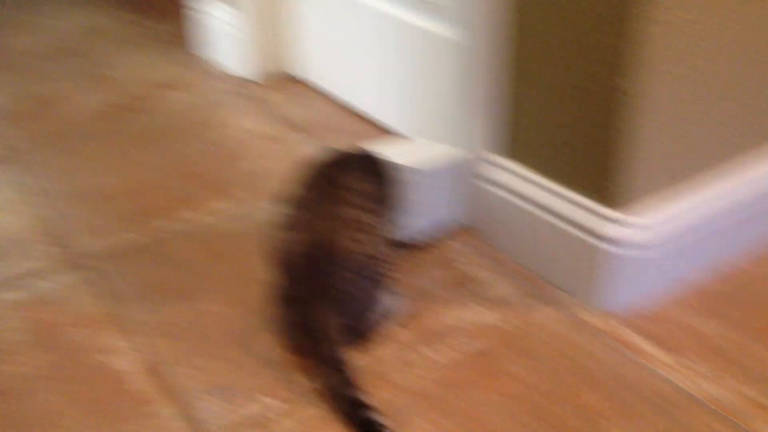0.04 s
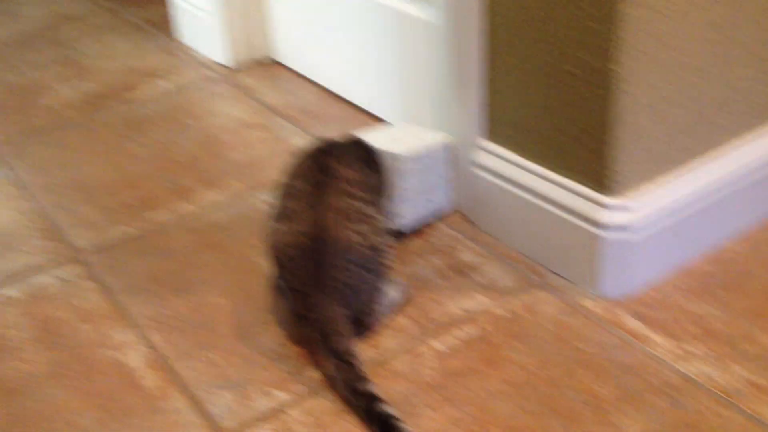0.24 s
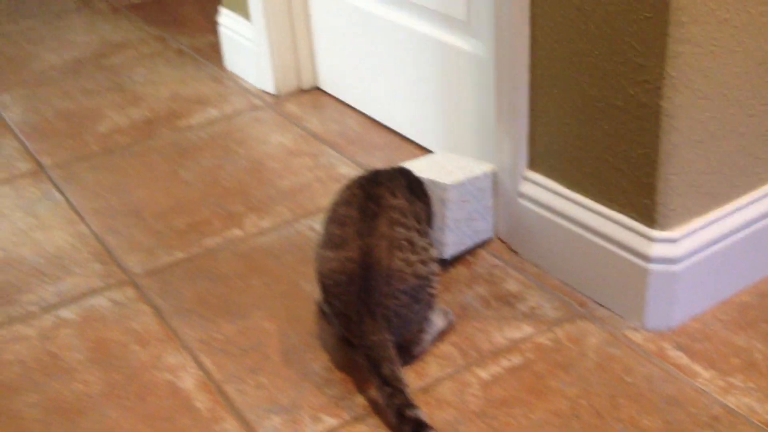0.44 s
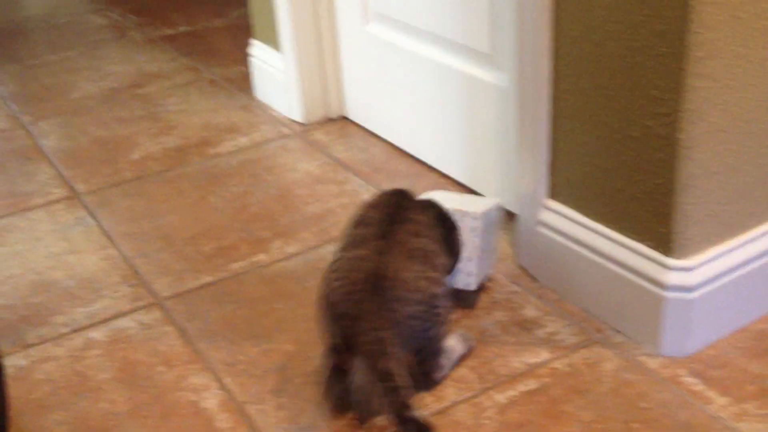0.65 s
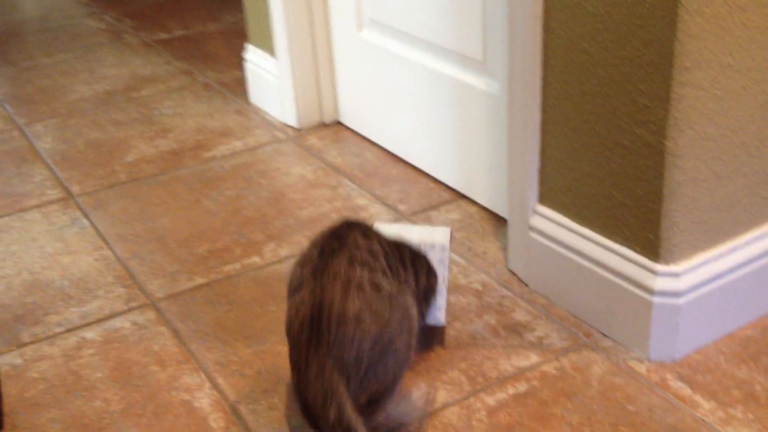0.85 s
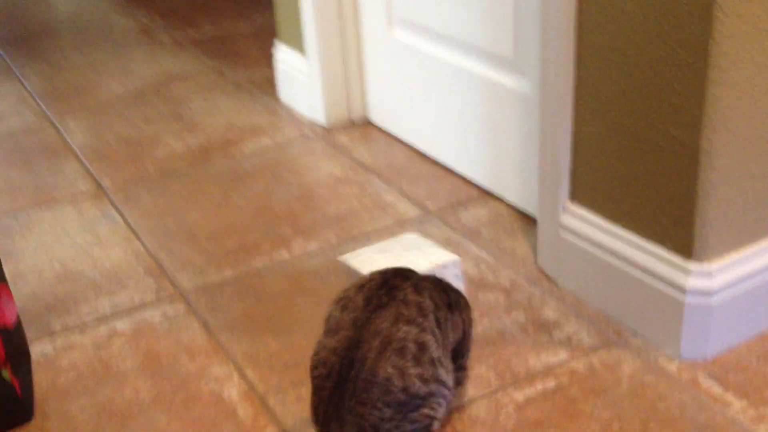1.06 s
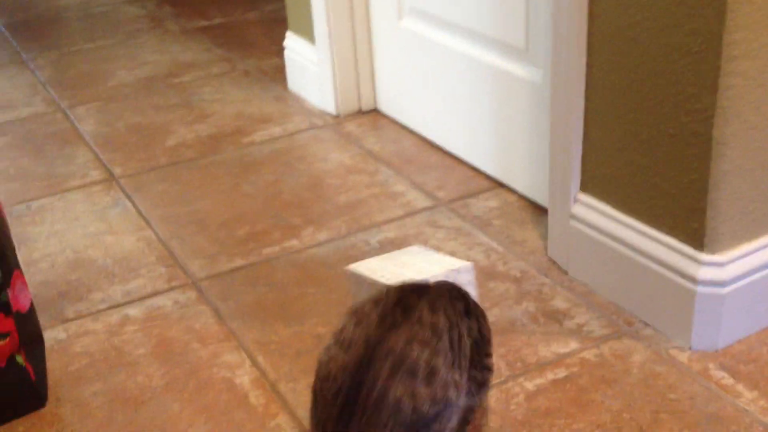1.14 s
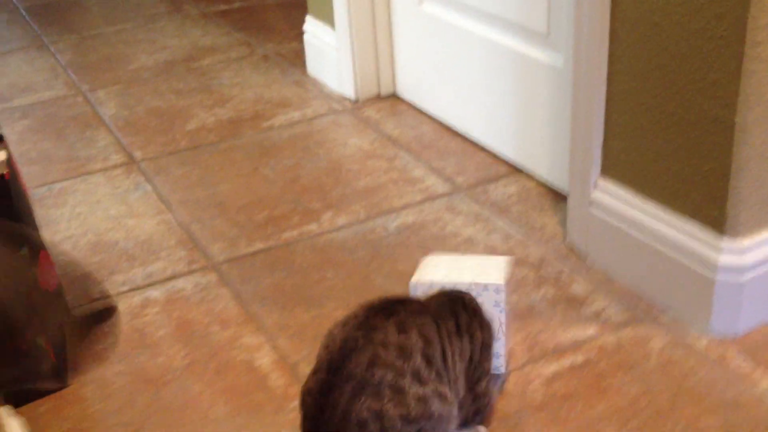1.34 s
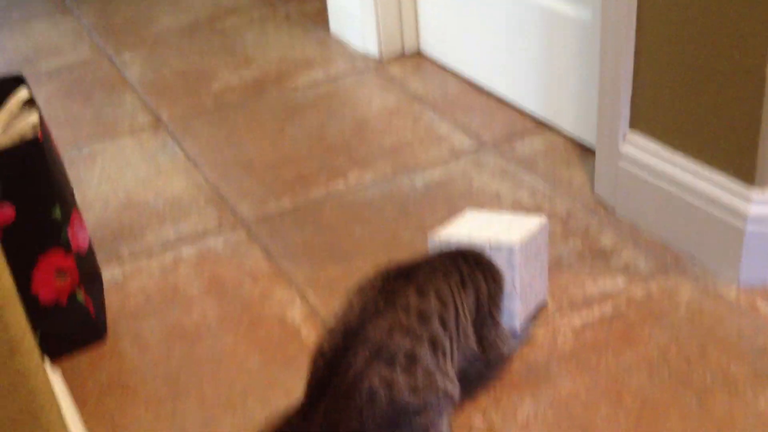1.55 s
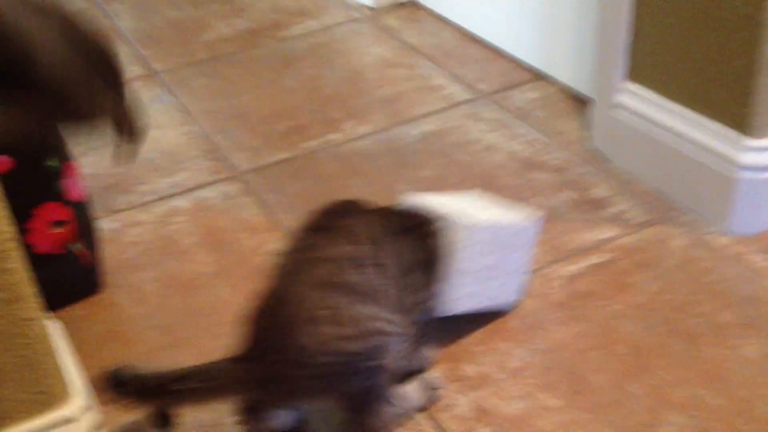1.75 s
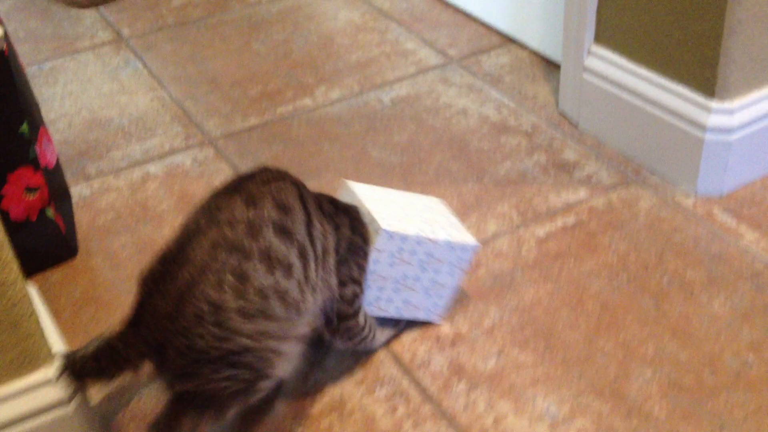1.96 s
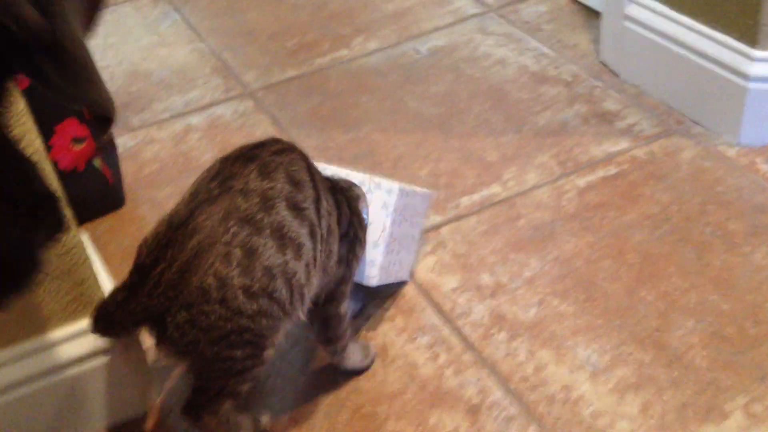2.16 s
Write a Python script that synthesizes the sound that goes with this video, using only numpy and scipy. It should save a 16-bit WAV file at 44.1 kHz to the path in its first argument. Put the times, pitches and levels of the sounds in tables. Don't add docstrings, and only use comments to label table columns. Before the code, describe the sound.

After a brief quiet moment, a collar bell jingles in irregular bursts amid claw scratches and dull cardboard knocks and scrapes on tile, then fades to soft hollow bumps, heard close by in a reflective hallway.

```python
import sys
import numpy as np
from scipy import signal
from scipy.fft import rfft, irfft, next_fast_len
from scipy.io import wavfile
from scipy.ndimage import uniform_filter1d, map_coordinates

SR = 44100
rng = np.random.default_rng(int(sys.argv[2]) if len(sys.argv) > 2 else 0)


def level_to_linear(level):
    exponent = np.asarray(level, float) / 20
    return 10 ** exponent


def log_audio(samples):
    frames = np.atleast_2d(samples).T
    limited = np.clip(frames, -1, 1)
    pcm = np.round(limited * 32767).astype(np.int16)
    wavfile.write(sys.argv[1], SR, pcm)


N = 97020


def unit(x):
    return x / np.sqrt(np.mean(x ** 2) + 1e-20)


def along(points, hz):
    point_hz, value = np.transpose(points)
    return np.interp(np.log(hz + 1), np.log(point_hz + 1), value)


def filtered(x, response):
    m = next_fast_len(len(x) + 8192)
    return irfft(rfft(x, m) * response(np.fft.rfftfreq(m, 1 / SR)), m)[:len(x)]


def add(track, start_s, x):
    part = track[round(start_s * SR):][:len(x)]
    part += x[:len(part)]


def ring(modes, strikes, rise_s, free_db, shiver_rad, size=N):
    choke_t60_s = 0.023
    out = np.zeros(size)
    t = np.arange(SR // 4) / SR
    hz, level_db, t60_s = np.transpose(modes)[..., None]
    free = level_to_linear(free_db - 60 * t / np.maximum(t60_s, 0.01))
    choked = (1 - level_to_linear(free_db)) * level_to_linear(-60 * t / choke_t60_s)
    fade = level_to_linear(level_db) * (free + choked) * (1 - np.exp(-t / rise_s))
    drift = rng.standard_normal((len(hz), size + len(t)))
    drift = uniform_filter1d(uniform_filter1d(drift, size=150), size=150)
    drift = shiver_rad * unit(drift)
    for start_s, db, phase, detune in strikes:
        wander = drift[:, round(start_s * SR):][:, :len(t)]
        tones = np.sin(2 * np.pi * (hz * detune * t + phase[:, None]) + wander)
        add(out, start_s, level_to_linear(db) @ (fade * tones))
    return out


def bursts(rows, spectrum, q, broad_db, spiky, tick):
    swell = 0.11
    out = np.zeros(N)
    t = np.arange(SR // 6) / SR
    noise = rng.standard_normal((len(rows), 2, len(t)))
    for (start_s, db, hz, length_s), (hiss, bumps) in zip(rows, noise):
        grit = unit(hiss * np.exp(spiky * uniform_filter1d(bumps, size=9)))
        rise = 1 - np.exp(-t / (0.0002 + swell * length_s))
        shape = np.exp(-t / max(length_s, 0.001)) * rise

        def colour(f):
            damping = 1j * f * hz / q
            peak = damping / (hz * hz - f * f + damping)
            return peak ** 2 + level_to_linear(broad_db + along(spectrum, f)) / np.sqrt(q)

        x = filtered(grit * shape + tick * (t == 0), colour)
        add(out, start_s, level_to_linear(db) * x / np.abs(x).max())
    return out


# frequency in Hz, level in dB per Hz.
AIR_COLOUR = [(24, -40), (60, -26), (130, -10), (300, -8.5), (562, -12.5), (704, -18.5), (15500, -22.5)]


def still_air():
    noise = rng.standard_normal(N)
    return level_to_linear(-62) * unit(filtered(noise, lambda f: level_to_linear(along(AIR_COLOUR, f))))


# frequency in Hz, t60 in s.
HALL_T60 = [(200, 0.08), (2000, 0.47), (8000, 0.51), (15000, 0.32)]


def hall(near):
    wet_db, delay_s = -12.5, 0.005
    out = np.zeros(N)
    step = SR // 5
    for i in range(0, N, step):
        hz, t, z = signal.stft(rng.standard_normal(SR // 2), SR, nperseg=256)
        decay = level_to_linear(-60 * t / along(HALL_T60, hz)[:, None])
        tail = signal.istft(z * decay, SR, nperseg=256)[1]
        tail /= np.linalg.norm(tail)
        add(out, i / SR + delay_s, signal.fftconvolve(near[i:i + step], tail))
    return level_to_linear(wet_db) * out


# time in s, rubbing level in dB.
DRAG_LEVEL = [(.17, -99), (.34, -61), (.40, -53.5), (.46, -44), (.70, -46.5), (0.996, -33), (1.10, -47),
              (1.218, -37), (1.399, -52.5), (1.52, -65), (1.78, -60), (1.90, -58), (2.2, -67)]
# frequency in Hz, level in dB.
RUB_COLOUR = [(60, -28), (140, -0.5), (300, -4), (1000, -3), (2500, -3.5), (4200, 2), (15000, 2.5)]


def drag():
    grains_per_s, grain_db, hiss_level = 2200, 2.6, 0.8
    pitch_hz, pitch_spread, grain_cycles = 2000, 0.9, 3
    lump_db, lumps_per_s = 3.5, 30
    when, pitch, size = rng.random((3, round(grains_per_s * N / SR)))
    hz = pitch_hz * np.exp(pitch_spread * 3.92 * (pitch - 0.5))
    hz = np.clip(hz, 100, SR / 3)[:, None]
    t = np.arange(400) / SR
    level = level_to_linear(-grain_db * np.log(size + 0.011))[:, None] * np.sqrt(hz)
    grain = level * np.exp(-t * hz / grain_cycles * 2) * np.sin(2 * np.pi * hz * t)
    place = (when * N).astype(int)[:, None] + np.arange(len(t))
    grains = np.bincount(place.ravel(), grain.ravel(), minlength=N)[:N]
    lump_curve = map_coordinates(rng.standard_normal(80), [np.arange(N) * lumps_per_s / SR])
    texture = unit(grains) + hiss_level * rng.standard_normal(N)
    rub = filtered(texture, lambda f: level_to_linear(along(RUB_COLOUR, f)))
    time_s, level_db = np.transpose(DRAG_LEVEL)
    motion_db = np.interp(np.arange(N) / SR, time_s, level_db)
    return level_to_linear(motion_db) * unit(level_to_linear(lump_db * lump_curve) * rub)


# start in s, peak in dB, wall struck in Hz.
BOX_BOOMS = [(.55, -32, 292), (0.68, -44, 292), (.805, -40.5, 292), (1.121, -42.5, 280),
             (1.199, -44.5, 280), (1.27, -52, 292), (1.365, -41.5, 600), (1.378, -45.5, 438),
             (1.439, -53.5, 430), (1.401, -55.5, 186), (1.492, -50.5, 430), (1.50, -55.5, 186),
             (1.645, -57.5, 186), (1.711, -58, 186), (1.747, -50.5, 186), (1.783, -42, 459.5),
             (1.821, -52, 186), (1.861, -49.5, 186), (1.945, -31.5, 600), (1.965, -33.5, 383),
             (2.03, -42, 622), (2.07, -52, 450), (2.12, -57, 613), (2.18, -39.5, 186)]
# frequency in Hz, level in dB, t60 in s.
BOX_MODES = [(186, 3.5, 0.23), (292, 0.5, 0.24), (372.6, -2.5, 0.18), (442.7, 5.5, .1), (600, -0.5, 0.12),
             (656.4, -2.5, 0.13), (865, -8, 0.097), (1010, -4.5, 0.084)]


def box_booms():
    boom_db, favour_db, reach_hz, scatter_db = -7, 9, 60, 1.5
    hz = np.transpose(BOX_MODES)[0]
    chance = rng.standard_normal((len(BOX_BOOMS), 2, len(hz)))
    strikes = []
    for (start_s, db, wall_hz), (scatter, phase) in zip(BOX_BOOMS, chance):
        favour = favour_db * np.exp(-((hz - wall_hz) / reach_hz) ** 2)
        strikes.append((start_s, db + boom_db + favour + scatter_db * scatter, phase / 8, 1))
    return ring(BOX_MODES, strikes, rise_s=0.0051, free_db=-1.46, shiver_rad=0.28)


# start in s, peak in dB, resonance in Hz, length in s.
EDGE_KNOCKS = [(0.2215, -26, 1310, 0.0056), (.285, -57, 1220, 0.0048), (0.354, -43.5, 740, 0.011),
               (0.432, -26.5, 734, 0.013), (.51, -39, 1050, 0.01), (.522, -34, 1380, 0.0047),
               (0.548, -16, 911.5, 0.02), (0.597, -25.5, 1010, 0.0084), (0.677, -26, 633, 0.013),
               (.718, -30, 1530, 0.0043), (.758, -34, 1080, 0.0057), (0.804, -21.5, 1120, 0.014),
               (.825, -29.5, 1640, 0.031), (0.912, -18, 737, 0.0055), (0.986, -17.5, 1400, 0.0035),
               (1.029, -22.5, 780, 0.019), (1.15, -20.5, 770, 0.01), (1.158, -20.5, 1540, 0.0065),
               (1.602, -53, 1300, 0.0066)]
# frequency in Hz, level in dB.
CARD_COLOUR = [(60, -10), (150, 12.5), (300, 15), (1000, 16.5), (2500, 11.5), (6000, -18.5)]


def box_knocks():
    return bursts(EDGE_KNOCKS, CARD_COLOUR, q=3, broad_db=-14, spiky=1.2, tick=7.1)


def thump():
    start_s, width_s = 0.2255, 0.0008
    u = np.clip((np.arange(N) / SR - start_s) / width_s, 0, 99)
    return level_to_linear(-14.5) * u * (2 - u) * np.exp(-u)


# start in s, peak in dB, resonance in Hz, scratch length in s.
CLAW_TICKS = [(0.191, -21, 4400, 0.0034), (0.194, -24.5, 4430, 0.0069), (0.2222, -2, 3950, 0.0055),
              (0.414, -27.5, 6250, 0.047), (0.4357, -12.5, 2700, 0.023), (0.5426, -22, 1830, 0.031),
              (0.5648, -15.5, 4500, 0.01), (0.7111, -9, 2690, 0.012), (0.9481, -15.5, 6360, 0.023),
              (1.0369, -17, 6300, 0.0087), (1.1497, -16.5, 2270, 0.015), (1.1793, -12.5, 6470, 0.021),
              (1.4484, -19.5, 3600, 0.026), (1.458, -14.5, 5680, 0.032), (1.8602, -31.5, 4800, 0.061),
              (1.916, -27.5, 4670, 0.013), (2.115, -29.5, 4660, 0.016), (.0833, -56, 12000, .002),
              (.1, -45, 10000, 0.0018), (.1955, -18, 10800, 0.0025), (.328, -38, 5000, .004),
              (.349, -29, 7270, 0.0055), (.3696, -30, 9500, .002), (.916, -30, 10000, .003),
              (1.717, -25, 14000, 0.0023), (1.1498, -30, 12000, .004), (1.285, -21.5, 3630, 0.0043),
              (1.87, -40, 4500, 0.0045), (1.882, -40, 8500, 0.0044), (2.1156, -20.5, 9700, 0.0026),
              (2.128, -36.5, 9230, .02)]
# frequency in Hz, level in dB.
CLAW_COLOUR = [(1000, -30), (2000, 2), (4000, 11), (8000, 10.5), (15000, 2)]


def claws():
    return bursts(CLAW_TICKS, CLAW_COLOUR, q=4.4, broad_db=-5.5, spiky=1.8, tick=5)


# start in s, level in dB, frequency in Hz, t60 in s.
COLLAR_PINGS = [(.226, -32, 6600, 0.062), (0.2, -48, 4270, 0.067), (0.447, -26, 2750, 0.029),
                (0.47, -24, 4370, 0.035), (0.72, -20.5, 8530, 0.11), (0.71, -20.5, 6200, 0.038),
                (.45, -15, 13290, .15), (.519, -17, 11800, 0.05), (1.059, -21.5, 6100, 0.053),
                (1.182, -25, 7200, 0.13), (0.835, -32.5, 6400, 0.064), (0.99, -12, 11800, .05),
                (1.088, -22, 6100, 0.058), (1.459, -33, 2552, 0.14), (1.462, -28.5, 4000, .1),
                (1.472, -17, 13000, .03), (1.58, -40, 3795, 0.23), (1.606, -48, 3310, 0.48),
                (1.601, -17, 13350, 0.22), (1.603, -21, 14960, 0.4), (1.633, -35.5, 3330, 0.18),
                (1.76, -66, 3310, 0.73), (1.846, -41.5, 6000, 0.043), (1.862, -39, 4800, .05),
                (1.642, -15, 11770, 0.17), (1.644, -38.5, 6600, 0.33), (1.788, -38.5, 11500, 0.11),
                (1.918, -38.5, 2180, 0.047), (2.0, -55, 9000, 0.084), (2.013, -46, 8800, 0.083),
                (1.98, -28.5, 11650, 0.052), (2.03, -50, 6050, .08), (2.065, -43, 6050, 0.05),
                (1.085, -34, 9000, .02)]


def pings():
    out = np.zeros(N)
    for start_s, db, hz, t60_s in COLLAR_PINGS:
        strike = (0, [db], np.zeros(1), 1)
        tone = ring([(hz, 0, t60_s)], [strike], 0.00058, -3.45, shiver_rad=0.3, size=SR // 4)
        add(out, start_s, tone)
    return out


# start in s, peak in dB, part of the shell struck in Hz, rattle in s.
COLLAR_JERKS = [(2.028, -33.5, 10200, 0.0068), (0.188, -50, 13300, 0.005), (0.1945, -47, 10500, 0.0031),
                (0.222, -4, 10600, 0.0068), (0.3694, -34, 10200, .01), (0.4184, -11, 12200, 0.028),
                (0.446, -9, 13300, 0.022), (0.5202, -22, 11500, 0.003), (0.544, -21, 14200, 0.012),
                (0.596, -3, 10200, 0.0089), (0.647, -18, 14400, 0.0095), (0.7167, -6, 10800, 0.011),
                (0.7919, -13, 10300, 0.013), (0.841, -16, 14270, 0.025), (0.949, -7, 10700, 0.045),
                (1.058, -2.5, 12300, 0.0056), (1.0703, -5.5, 12000, 0.015), (1.094, -41, 10600, 0.0092),
                (1.1823, -4.5, 11060, 0.033), (1.282, -17.5, 10660, 0.0048), (1.319, -16, 14600, 0.0069),
                (1.345, -22, 14300, 0.004), (1.4597, -9, 10980, 0.015), (1.6, -6.5, 14130, 0.018),
                (1.641, -16.5, 11800, 0.022), (1.715, -22, 14700, 0.0097), (1.833, -43, 13400, 0.011),
                (1.8444, -20, 9800, 0.0041), (2.036, -30.5, 13290, 0.0085), (2.0642, -28, 10660, 0.0075)]
SHELL_MODE_HZ = [10890, 6022, 6628, 8540, 10200, 10290, 11670, 11785, 11860, 13170, 13290, 14560, 14780,
                 14960]
# level in dB, t60 in s.
SHELL_MODE_DECAY = [(-25, 0.05), (-24, 0.08), (-22, 0.24), (-31, 0.09), (-1.5, 0.092), (-4, 0.28),
                    (-2.5, 0.041), (-8, 0.13), (0.5, 0.16), (-23, 0.11), (0, 0.21), (-3.5, 0.089),
                    (-1.5, 0.054), (-6.5, 0.24)]
# time in s, lasting ring in dB.
BELL_FREEDOM = [(.18, -6), (.222, -26), (.37, 0), (.45, -10), (.597, -6), (.72, -1), (.85, 4), (.95, 2.5),
                (1.07, -7), (1.18, 4), (1.32, -3), (1.46, 2), (1.6, 7.5), (1.85, -4), (2.1, -5)]
# frequency in Hz, level in dB.
CLICK_COLOUR = [(1500, -17), (5000, -11), (8000, 3), (11000, 1.5), (15000, 1.5)]


def bell():
    count, rattle_loss_db, bell_db = 10, 10.5, -0.5
    click_db, click_length_s = -5.5, 0.004
    favour_db, favour_hz, detune = 10, 700, 0.003
    jerk_scatter_db, strike_scatter_db = 4.5, 4
    free_db = -12
    hz = np.array(SHELL_MODE_HZ)
    modes = np.column_stack([hz, SHELL_MODE_DECAY])
    hang_s, hang_db = np.transpose(BELL_FREEDOM)
    out, clicks = np.zeros(N), []
    for start_s, db, part_hz, rattle_s in COLLAR_JERKS:
        jitter = rng.random(count)
        jitter[0] = 0
        steps = (np.arange(count) + jitter) / count
        lift = favour_db * np.exp(-((hz - part_hz) / favour_hz) ** 2)
        lift = lift + jerk_scatter_db * rng.standard_normal(len(hz))
        strikes = []
        for step in steps:
            scatter = rng.standard_normal(len(hz))
            strike_db = lift - rattle_loss_db * step + strike_scatter_db * scatter
            strikes.append((rattle_s * step, strike_db, rng.random(len(hz)), 1 + detune * scatter[0]))
        lasting_db = min(free_db + np.interp(start_s, hang_s, hang_db), -1)
        jingle = ring(modes, strikes, 0.00018, lasting_db, shiver_rad=0.63, size=SR // 3)
        add(out, start_s, level_to_linear(db + bell_db) * jingle / np.abs(jingle).max())
        for step in steps[::3]:
            peak_db = db + click_db - rattle_loss_db * step
            clicks.append((start_s + rattle_s * step, peak_db, part_hz, click_length_s))
    return out + bursts(clicks, CLICK_COLOUR, q=6.6, broad_db=1.6, spiky=0.61, tick=0.91)


def scene():
    near = box_booms() + box_knocks() + claws() + pings() + bell()
    return (still_air() + hall(near) + drag() + thump() + near)[None]


def roll_off(x):
    return signal.sosfilt(signal.butter(12, 16620, fs=SR, output="sos"), x)


def record(dry):
    low_hz, top_hz, edge_hz, edge_db = 123, 15230, 250, -36

    def microphone(f):
        bass_cut = (1j * f / (low_hz + 1j * f)) ** 2
        return bass_cut * level_to_linear(edge_db * np.clip((f - top_hz) / edge_hz, 0, 1))

    mix = filtered(dry[0], microphone)[None]
    return roll_off(mix)


dry = scene()
out = record(dry)
log_audio(out)
```